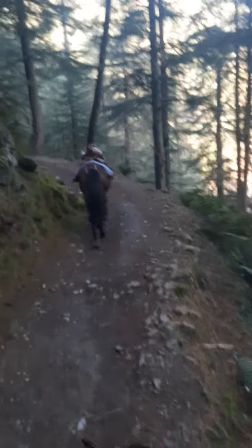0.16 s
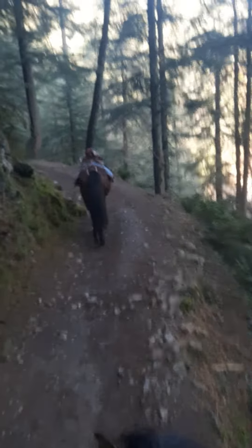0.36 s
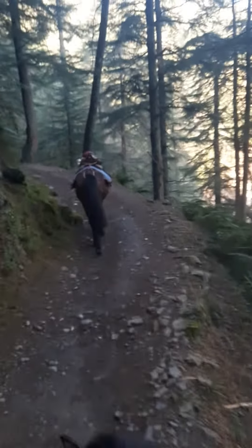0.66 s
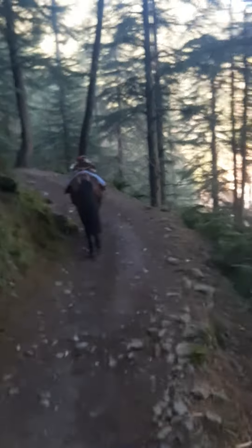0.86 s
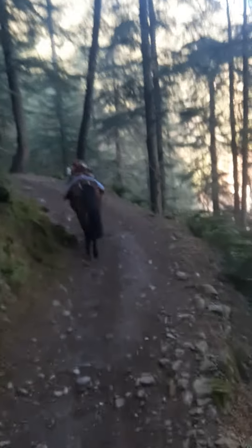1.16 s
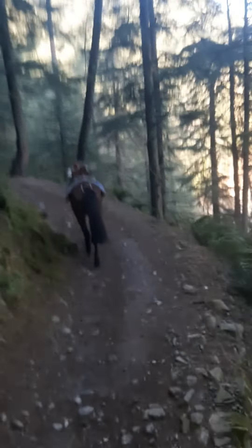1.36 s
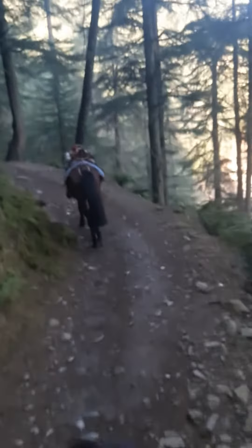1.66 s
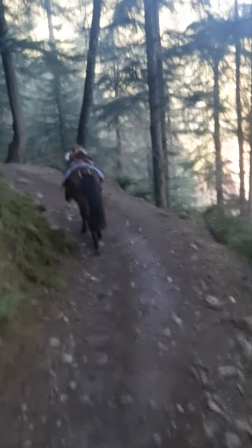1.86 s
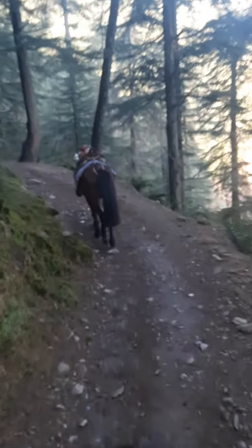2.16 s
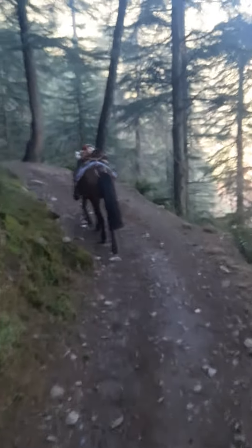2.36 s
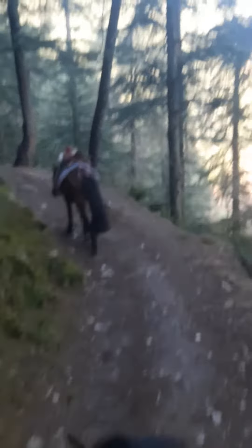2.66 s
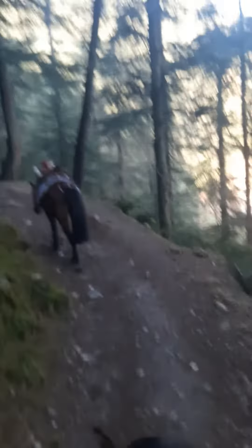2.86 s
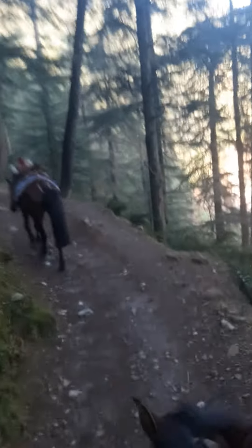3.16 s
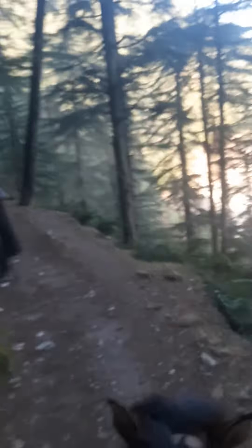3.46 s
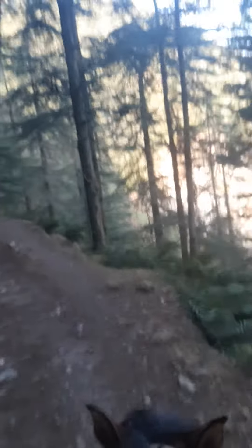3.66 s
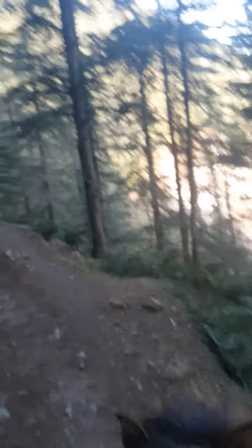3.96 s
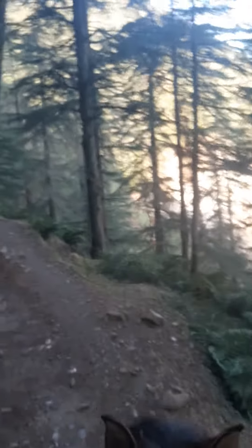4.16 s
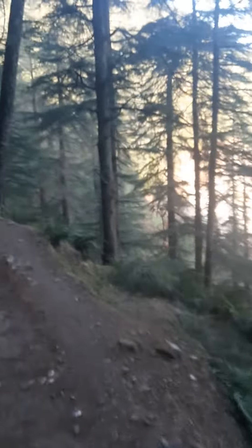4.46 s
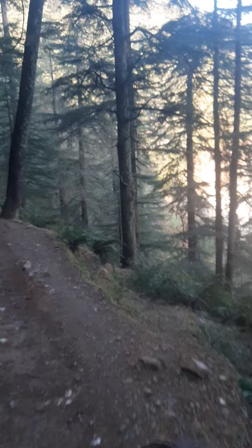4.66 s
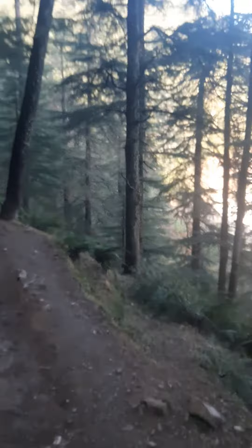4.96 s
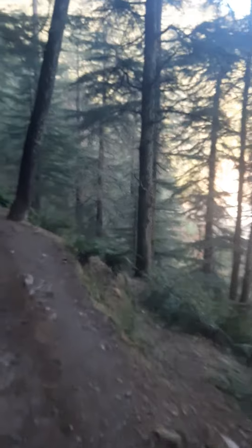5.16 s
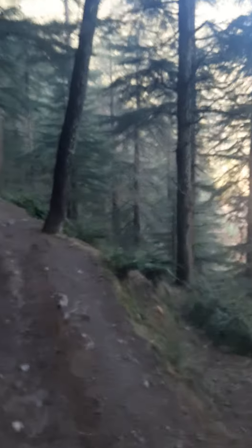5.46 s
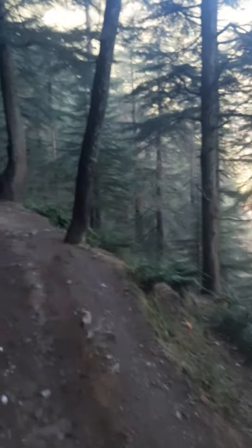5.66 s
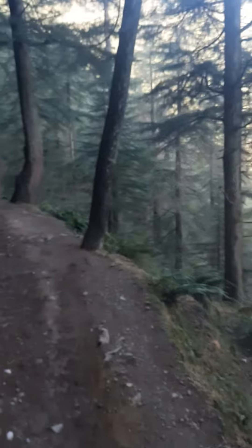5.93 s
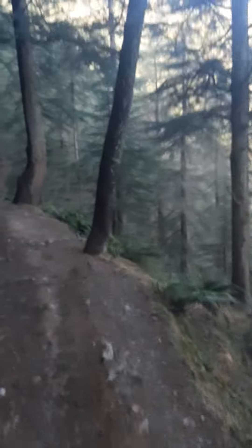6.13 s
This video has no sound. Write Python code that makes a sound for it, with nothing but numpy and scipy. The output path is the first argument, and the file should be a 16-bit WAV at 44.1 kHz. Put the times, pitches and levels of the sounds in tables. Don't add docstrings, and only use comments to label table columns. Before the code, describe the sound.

A horse walks a gravelly dirt path: hollow thuds, sharp stone cracks, rolling pebbles, a finger bump and a brief buckle jangle.

```python
import sys
import numpy as np
from scipy import signal
from scipy.io import wavfile
from scipy.ndimage import uniform_filter1d

SR = 44100
rng = np.random.default_rng(int(sys.argv[2]) if len(sys.argv) > 2 else 0)


def generate_wav(signal):
    frames = np.transpose(np.atleast_2d(signal))
    scaled = np.clip(frames, -1, 1) * 32767
    pcm = np.round(scaled).astype(np.int16)
    wavfile.write(sys.argv[1], SR, pcm)


def linear_from_db(decibels):
    return 10 ** (np.asarray(decibels, float) / 20)


N = 277521
LAG = 20

# middle_s, grit_scuff_db, coat_rustle_db, half_length_s
LEG_SWINGS = [(0.0, -59.5, -64, 0.084), (0.259, -57, -57.5, 0.16), (0.524, -62.5, -60, 0.13),
              (0.686, -61.5, -55.5, 0.068), (0.837, -58, -57, 0.087), (1.085, -58, -64, 0.033),
              (1.212, -62, -67, 0.097), (0.977, -67.5, -71, 0.084), (1.333, -83, -67.5, 0.094),
              (1.413, -66, -73.5, 0.088), (1.617, -63, -62.5, 0.16), (1.793, -80, -64.5, 0.064),
              (2.008, -64.5, -65, 0.27), (2.168, -65.5, -66, 0.13), (2.402, -67, -63.5, 0.083),
              (2.55, -56, -57, 0.11), (2.71, -61, -58.5, 0.058), (2.789, -60, -59.5, 0.035),
              (2.876, -56, -61.5, 0.059), (3.02, -56.5, -55.5, 0.11), (3.13, -57.5, -62.5, 0.094),
              (3.283, -56, -53.5, 0.094), (3.468, -59, -56, 0.13), (3.617, -60.5, -64.5, 0.052),
              (3.715, -54.5, -65.5, 0.058), (3.791, -54, -57.5, 0.048), (3.892, -61.5, -55.5, 0.054),
              (4.006, -53, -51, 0.078), (4.189, -55, -53.5, 0.098), (4.37, -58.5, -57.5, 0.091),
              (4.547, -61.5, -59, 0.11), (4.743, -58.5, -60.5, 0.12), (4.91, -57.5, -54.5, 0.081),
              (5.116, -57.5, -58, 0.11), (5.344, -62, -59.5, 0.11), (5.494, -69.5, -68, 0.047),
              (5.646, -55, -58, 0.09), (5.816, -62, -59.5, 0.07), (5.923, -68, -69.5, 0.068),
              (6.055, -58, -59.5, 0.13), (6.25, -59.5, -59.5, 0.17)]
# start_s, level_db
FINGER_TAPS = [
    (.92405, 3.9),
    (.9247, -4),
    (.9317, 4.9),
]


def evened(x):
    return x / np.sqrt(np.mean(x ** 2) + 1e-20)


def read(points, hz):
    f, value = np.transpose(points)
    return np.interp(np.log(hz + 1), np.log(f + 1), value)


def add(mix, s, sound):
    part = mix[max(round(s * SR), 0):][:len(sound)]
    part += sound[:len(part)]


def blow(hz, db, cycles):
    u = np.arange(round(7 * cycles / hz * SR)) * hz / SR / cycles
    return -linear_from_db(db) * u * np.exp(1 - u) * np.sin(2 * np.pi * cycles * u)


def ring(hz, db, t60):
    t = np.arange(round(np.clip(t60, .004, .3) * SR)) / SR
    return linear_from_db(db - 60 * t / t60) * np.sin(2 * np.pi * hz * t)


def below(x):
    shadow_db, shadow_hz, nearer_db = -5, 5200, 1.9
    low = signal.filtfilt(*signal.butter(1, shadow_hz, fs=SR), x)
    left = np.pad(low + linear_from_db(shadow_db) * (x - low), (LAG, 0))[:N]
    return np.array([left, linear_from_db(nearer_db) * x])


def wash(spectrum, level_db, same, patchy_db, flicker_db, size):
    hop = size // 4
    frames, hz = N // hop + 5, np.fft.rfftfreq(size, 1 / SR)
    a, b, c, d, patches = rng.standard_normal((frames, len(hz), 5)).T
    patches = uniform_filter1d(patches, size=6, axis=0)
    patches = evened(uniform_filter1d(patches, size=16, axis=1))
    flicker = evened(uniform_filter1d(rng.standard_normal(frames), size=3))
    right, same = a + 1j * b, np.clip(same, 0, 1)
    late = np.exp(-2j * np.pi * hz * LAG / SR)[:, None]
    left = same * late * right + np.sqrt(1 - same ** 2) * (c + 1j * d)
    z = np.array([left, right])
    z *= linear_from_db(read(spectrum, hz)[:, None] + patchy_db * patches + flicker_db * flicker)
    noise = signal.istft(z, nperseg=size, noverlap=size - hop)[1][:, :N]
    return linear_from_db(level_db) * evened(noise)


def swings(peaks_db):
    edge_db, edge_power, still_db = 10, 2.6, -98
    s, _, _, half = np.transpose(LEG_SWINGS)[:, :, None]
    t = np.arange(0, N, 64) / SR
    away = abs(t - s) / np.maximum(half, .02)
    swells = linear_from_db(peaks_db[:, None] - edge_db * away ** edge_power)
    power = (swells ** 2).sum(axis=0) + linear_from_db(still_db) ** 2
    return np.interp(np.arange(N) / SR, t, 10 * np.log10(power))


def stride():
    # pitch_hz, level_db
    shuffle = [(30, 9.5), (70, -0.5), (120, 5.5), (250, 9), (420, 7), (800, -32)]
    scuff = [(250, -1), (600, 6), (1000, 5), (1700, 4.5), (2600, -10), (4500, -1), (8000, -44)]
    rustle = [(800, -14.5), (2500, -4.5), (4500, -5), (7000, -4), (12000, -1.5), (16000, -1.5)]
    swish = [(9500, -43), (11500, 10.5), (16000, 6)]
    # middle_s, extra_swish_db, half_length_s
    flicks = [
        (0.2, 8, 0.037),
        (1.58, 14, 0.14),
        (2.25, 0, .025),
        (2.53, 19, 0.083),
        (3.342, 12, .03),
        (4.167, 15.5, 0.075),
        (4.85, -2, .03),
        (5.146, 15, 0.046),
    ]
    _, grit_peaks_db, coat_peaks_db, _ = np.transpose(LEG_SWINGS)
    grit_db, coat_db = swings(grit_peaks_db), swings(coat_peaks_db)

    earth_db = -65 + 0.79 * (grit_db + 58)
    earth = wash(shuffle, earth_db + 6.0, 0.99, 1.0, 1.6, size=1024) * linear_from_db([[-1], [1]])
    grit = wash(scuff, grit_db + 2.5, 0.04, 1.0, 3.3, size=256) * linear_from_db([[-2.5], [2.5]])
    coat = wash(rustle, coat_db + 12.0, 0.0057, 1, 1.0, size=256) * linear_from_db([[-3], [2.5]])

    swish_db = -56.5 + 0.92 * (coat_db + 54)
    t = np.arange(N) / SR
    swish_db += sum(db * np.exp(-((t - s) / half) ** 2) for s, db, half in flicks)
    hair = wash(swish, swish_db, 0.046, 0.95, 0.87, size=256) * linear_from_db([[-10], [3.5]])

    ticks_per_s = 400
    ticks = linear_from_db(1.04 * np.minimum(rng.exponential(1, N), 4)) * (rng.random(N) < ticks_per_s / SR)
    stone = rng.integers(0, 8, N)
    gravel = sum(signal.oaconvolve(ticks * (stone == k), blow(hz, 0, 0.24))[:N]
                 for k, hz in enumerate(np.geomspace(900, 7500, 8)))
    return earth + grit + coat + hair + below(linear_from_db(grit_db - 10.5) * evened(gravel))


def thuds():
    # start_s, peak_db, pitch_hz
    clops = [(0.0204, -37.5, 290), (0.2132, -40.5, 523), (0.2893, -38, 325), (0.7245, -38, 252),
             (0.808, -34, 213), (2.0446, -37, 206), (2.1402, -33, 181), (2.5095, -33, 289),
             (2.5145, -39.5, 252), (2.591, -31, 221), (2.5984, -32, 248), (2.7628, -37, 255),
             (3.0076, -41, 190), (3.134, -34, 255), (3.5151, -33.5, 460), (3.5383, -32.5, 478),
             (4.2442, -27.5, 265), (4.44, -24.5, 182), (4.9069, -34.5, 245), (5.6242, -33.5, 290),
             (5.68, -30.5, 263), (5.7943, -44, 183), (5.9731, -44, 254), (6.064, -31.5, 301)]
    # start_s, peak_db, pitch_hz, length_cycles
    thumps = [(0.0252, -44.5, 134, 1.2), (0.4693, -46.5, 124, 0.6), (0.49, -43.5, 66.4, 0.26),
              (0.6712, -60, 68.6, 1.7), (0.72, -40.5, 110, 1.4), (0.811, -33.5, 72.4, 0.35),
              (1.8605, -37.5, 92, 0.31), (2.3423, -40.5, 127, 0.17), (2.524, -38.5, 75.4, 0.25),
              (2.6084, -37, 109, 0.36), (2.81, -34.5, 143, 0.54), (3.0326, -38, 97, 0.44),
              (3.125, -44.5, 109, 0.75), (3.413, -46, 99, 0.93), (3.545, -32.5, 109, 0.78),
              (3.71, -45.5, 141, 1), (4.7152, -51, 86, 1.2), (5.1683, -32, 108, 0.5),
              (5.176, -32, 94.4, 0.91), (5.3827, -33.5, 105, 0.34), (5.6294, -32.5, 91, 0.68),
              (5.806, -50.5, 99, 0.95), (6.0, -54, 67, 1.9), (6.059, -33, 109, 0.27),
              (6.069, -25.5, 88, 0.52), (6.161, -43, 110, 0.29), (6.277, -28.5, 97, 0.37)]
    # start_s, peak_db, pitch_hz
    slaps = [(0.2829, -32.5, 203), (0.7339, -26.5, 283), (0.8319, -28, 238), (1.166, -31, 304),
             (1.3571, -43, 258), (1.635, -40.5, 230), (1.7026, -41.5, 240), (1.8569, -35.5, 244),
             (2.1564, -31, 230), (2.7705, -26, 198), (3.1304, -37, 434), (3.397, -30.5, 224),
             (3.6717, -37.5, 296), (3.7796, -23, 205), (3.7854, -31, 386), (3.9754, -38.5, 254),
             (4.2491, -26.5, 213), (4.712, -40, 200), (5.1639, -28, 258), (5.1739, -29.5, 216),
             (5.827, -43.5, 153), (6.0556, -20.5, 265), (6.2724, -28.5, 253)]
    # start_s, peak_db, pitch_hz
    cups = [
        (1.9505, -47.5, 212),
        (3.2692, -45.5, 273),
        (3.4033, -36.5, 344),
        (3.5242, -40, 219),
        (3.7795, -36, 185.5),
        (3.9488, -50, 211),
        (4.977, -45.5, 280),
        (5.3769, -36.5, 313),
        (5.6759, -43, 211),
    ]
    out = np.zeros(N)
    kinds = (slaps, 0.54), (clops, 0.98), (cups, 1.87)
    for s, db, hz, cycles in thumps + [(*row, cycles) for rows, cycles in kinds for row in rows]:
        add(out, s, blow(hz, db, np.clip(cycles, .3, 1.6)))
    return out


def cracks():
    # start_s, peak_db, pitch_hz, grit_db
    strikes = [(0.0227, -29, 1200, -10), (0.2878, -42.5, 1270, -2.5), (0.7359, -17, 1560, -22),
               (1.0799, -35, 1300, -6.5), (1.166, -23.5, 2100, -17), (1.2101, -36, 1280, -11),
               (1.2627, -32, 1320, -14), (1.3585, -32, 1040, -8.5), (1.6862, -44.5, 1310, -4),
               (1.8563, -39, 2030, 5.5), (2.0467, -20, 3060, -11.5), (2.1425, -39.5, 1500, -0.5),
               (2.6063, -29, 1810, -8.5), (3.0136, -37.5, 1720, -6), (3.0212, -42, 1670, -1),
               (3.0365, -22, 1620, -14), (3.5407, -36, 840, 4), (3.6714, -37, 1200, 2),
               (3.785, -28.5, 2170, -2.5), (3.9559, -27, 1240, -26), (4.245, -11, 1475, -10),
               (4.268, -39, 1220, 1), (4.4467, -22.5, 1490, -2), (4.9078, -17, 1310, -12.5),
               (5.626, -32.5, 1620, -12), (5.667, -36, 1640, -6), (5.674, -35, 1470, -5),
               (6.2731, -33.5, 1190, -2.5)]
    # start_s, peak_db, pitch_hz, grit_db, splinters_db
    crunches = [(0.2104, -39.5, 1440, -4, -42), (0.7249, -36, 1690, -2.5, -42),
                (0.8093, -29.5, 1570, -14, -37), (2.511, -31.5, 1120, -6, -54), (2.56, -37.5, 900, -6, -49),
                (2.592, -35, 1740, -11, -32.5), (2.773, -31, 1360, -4.5, -30), (3.246, -39, 2090, 0.5, -39),
                (3.3987, -28, 2370, -15, -33), (3.5156, -25, 1170, -9.5, -32),
                (3.5455, -29.5, 1100, -20, -48), (3.7806, -24, 810, -6, -41), (3.7926, -30, 2640, -24, -41),
                (3.973, -32, 1210, -13, -40), (4.0155, -34, 970, -22, -52),
                (4.4421, -14.5, 1350, -10.5, -50), (4.7139, -36.5, 1560, -11, -39),
                (4.9139, -25, 1420, -32, -29), (4.9181, -28, 1500, -12, -42), (5.167, -27, 1520, -5.5, -50),
                (5.382, -28.5, 1230, -10, -32), (5.6036, -25, 3900, -14, -49),
                (5.686, -40.5, 1320, 5, -31.5), (5.6924, -33, 1440, -8, -42),
                (5.7921, -29.5, 1360, -21, -36.5), (6.0554, -24, 1980, -16, -48),
                (6.0621, -29.5, 3600, -11, -28.5), (6.088, -29.5, 1740, -7, -36)]
    # start_s, peak_db, pitch_hz, splinters_db
    chips = [(2.0515, -42, 3520, -23.5), (3.04, -52, 1620, -28), (3.133, -30, 1250, -30.5),
             (3.411, -36, 1880, -27), (3.484, -36.5, 2520, -34), (3.5197, -29.5, 1380, -28.5),
             (3.9502, -31, 1560, -37), (4.2504, -30, 1390, -25), (4.4156, -27, 1080, -28.5),
             (5.1733, -26, 1710, -25), (5.3881, -34.5, 1390, -32.5)]
    strike_splinter_db, chip_grit_db = -60, -44
    hits = [(*row, strike_splinter_db) for row in strikes] + crunches
    hits += [(s, db, hz, chip_grit_db, splinter_db) for s, db, hz, splinter_db in chips]

    out, t = np.zeros(N), np.arange(1300) / SR
    luck = rng.standard_normal((len(hits), 2, len(t)))
    splinter = signal.iirpeak(5600, .8, SR)
    for (s, db, hz, grit_db, splinter_db), (noise, lumps) in zip(hits, luck):
        sharp_db = splinter_db - db
        add(out, s, blow(hz, db + 2.0, 0.7))
        add(out, s + 0.44 / hz, blow(hz * 0.56, db - 0.5, 0.26))
        add(out, s, blow(hz * 2.0, db + 1.3 * sharp_db - 2.5, 0.32))

        lumps = evened(uniform_filter1d(lumps, size=25))
        grains = noise * linear_from_db(4 * lumps - 60 * t / 0.03) * (1 - np.exp(-t / 0.00033))
        body = signal.lfilter(*signal.iirpeak(hz * 0.43, .9, SR), grains)
        add(out, s, linear_from_db(db + min(grit_db, 3) + 14.5) * body)
        shards = signal.lfilter(*splinter, grains) + 0.38 * np.diff(grains, prepend=0)
        add(out, s, linear_from_db(db + sharp_db + 1.0 - 60 * t / 0.027) * shards)
    return out


def loose():
    # peak_s, peak_db, pitch_hz
    slumps = [(0.147, -52, 130), (0.32, -49, 148), (0.558, -53, 75), (0.962, -52, 109), (1.369, -47, 98),
              (1.718, -50.5, 109), (1.968, -53, 146), (2.409, -53, 85.5), (3.272, -47.5, 146),
              (5.19, -39, 97), (5.276, -49, 116), (0.37, -51, 70), (1.22, -45, 111), (3.845, -54, 80),
              (4.315, -53, 75), (4.505, -54, 103), (5.71, -52, 80.5)]
    # peak_s, peak_db, pitch_hz
    knocks = [(0.032, -33.5, 830), (0.181, -45, 694), (0.312, -52, 624), (0.514, -47.5, 590),
              (0.577, -51.5, 290), (0.811, -41, 700), (0.837, -43, 570), (0.951, -51, 226),
              (1.178, -52, 300), (1.224, -48, 678), (1.519, -52.5, 231), (1.55, -51, 328),
              (1.651, -49, 228), (1.698, -49, 678), (1.71, -51, 641), (1.947, -52, 660),
              (2.182, -43.5, 190), (2.506, -41.5, 470), (2.179, -54, 641), (2.594, -42, 575),
              (2.809, -46, 958), (2.916, -50, 470), (2.941, -50, 630), (3.059, -42, 260), (3.067, -45, 560),
              (3.095, -52, 205), (3.269, -42, 668), (3.417, -42, 500), (3.596, -53, 229), (3.994, -45, 256),
              (4.1, -55, 270), (4.158, -49, 738), (4.362, -46.5, 282), (4.4495, -33, 760),
              (4.551, -51, 1070), (4.769, -51, 348), (4.845, -44.5, 750), (4.94, -53, 237),
              (5.006, -50, 250), (5.177, -36.5, 390), (5.342, -50, 670), (5.416, -48, 364),
              (5.588, -47, 203), (5.85, -50, 640), (5.951, -46.5, 249), (6.057, -32, 677),
              (6.197, -46, 308), (6.249, -50, 501), (1.171, -42, 503), (3.79, -29, 594)]
    # peak_s, peak_db, pitch_hz
    gravel_grains = [(0.136, -53, 4310), (0.217, -48, 1190), (0.254, -52, 3500), (0.338, -44.5, 1873),
                     (1.066, -48.5, 4200), (1.081, -52, 4710), (1.094, -38, 1310), (1.168, -37, 3900),
                     (1.179, -33.5, 3180), (1.263, -59, 5130), (1.36, -32.5, 1350), (5.797, -38, 6000),
                     (1.699, -45.5, 1770), (1.861, -38, 3700), (1.946, -49, 2730), (2.694, -50, 2020),
                     (2.809, -45, 5500), (2.962, -44, 1320), (3.019, -44, 4980), (3.037, -35, 2620),
                     (3.071, -39, 1460), (3.155, -42, 2520), (3.179, -36.5, 1440), (3.187, -47, 1922),
                     (3.248, -44, 3580), (3.319, -49, 5000), (3.4245, -40, 6800), (3.433, -46, 1857),
                     (3.547, -38, 4300), (3.461, -43, 1615), (3.469, -42, 1916), (3.678, -36, 3300),
                     (3.714, -44, 1640), (3.951, -23.5, 3520), (4.247, -27.5, 4550), (4.297, -46, 1523),
                     (4.366, -39, 4970), (4.556, -45, 1710), (4.627, -38.5, 1170), (4.653, -40, 1249),
                     (4.845, -42, 3420), (4.937, -36, 1464), (4.998, -42, 1190), (5.166, -30.5, 4630),
                     (5.382, -27, 5260), (5.567, -44, 4200), (5.615, -40, 4500), (5.637, -44, 1800),
                     (5.653, -44, 2300), (5.661, -43, 1863), (5.685, -35, 2160), (5.837, -43, 6500),
                     (6.065, -31, 4360), (6.186, -42, 4300), (6.187, -40, 6300), (6.211, -46, 5000),
                     (6.248, -40, 4220), (6.247, -47, 1800), (6.0885, -25.5, 3200), (4.926, -37, 1010)]
    out, t = np.zeros(N), np.arange(600) / SR
    for rows, cycles in (slumps, 0.73), (knocks, 1.08), (gravel_grains, 1.47):
        for s, db, hz in rows:
            add(out, s - cycles / hz, blow(hz, db, cycles))
    dust_db, dust_t60_s = -3, 0.036
    for (s, db, hz), noise in zip(gravel_grains, rng.standard_normal((len(gravel_grains), len(t)))):
        dust = signal.lfilter(*signal.iirpeak(hz, 1.6, SR), noise)
        add(out, s, dust * linear_from_db(db + dust_db - 60 * t / dust_t60_s))
    return below(out)


def pebbles():
    knocked = [(0.135, -47, 1130), (0.1776, -49, 1250), (0.4718, -45, 1180), (0.9165, -57, 1100),
               (1.2735, -47, 1290), (1.957, -43.5, 1090), (1.9678, -62, 1210), (3.4246, -44, 4300),
               (3.4676, -43, 4720), (3.4775, -44, 4700), (3.7126, -42.5, 1070), (3.8124, -47, 2240),
               (4.1919, -40.5, 3840), (4.661, -41.5, 1160), (4.758, -51, 1430), (4.8439, -45, 1750),
               (5.334, -49, 1450), (5.5655, -54.5, 2140), (5.804, -33.5, 5600), (5.85, -40, 6740),
               (5.887, -48, 3000), (6.2213, -41, 6200)]
    out = np.zeros(N)
    for s, db, hz in knocked:
        add(out, s, blow(hz, db + 12.0, 0.45))
        add(out, s, blow(min(hz * 3, 9000), db + 18.0, 0.053))
    return out


def finger():
    # start_s, pitch_hz, level_db, t60_s
    case = [
        (0.9377, 54, -8.5, 0.064),
        (0.9385, 113, -15.5, 0.12),
    ]
    out, t = np.zeros(N), np.arange(1500) / SR
    step = (1 - np.exp(-t / .00021)) * (1 - t / .0014) * np.exp(-t / .0015)
    for s, db in FINGER_TAPS:
        add(out, s, linear_from_db(db) * step)
    for s, hz, db, t60 in case:
        add(out, s, ring(hz, db, t60))
    return out * linear_from_db([[-60], [0]])


def buckle():
    # start_s, level_db
    jingles = [
        (3.1773, -28),
        (3.308, -31),
        (3.4676, -25),
        (3.484, -33),
        (1.698, -44),
        (6.2204, -38),
    ]
    # pitch_hz, level_db, t60_s, joins_after_s
    modes = [(3230, -9, .6, .012), (7380, 3, .07, 0), (7900, -6, .2, .005), (8650, -3, .4, .008),
             (8920, -6, .4, .008), (15190, 7, .06, -.004), (15320, 6, .4, .012), (15385, 1, .5, .015)]
    jangle_s, jangle_db = 3.305, -46
    out, t = np.zeros(N), np.arange(200) / SR
    for (s, db), snap in zip(jingles, rng.standard_normal((len(jingles), len(t)))):
        add(out, s, np.diff(snap * linear_from_db(db - 60 * t / .006)))
    for (hz, db, t60, late), cluster in zip(modes, rng.standard_normal((len(modes), 12))):
        partials = [k * ring(hz * (1 + 0.004 * np.cos(9 * k)), jangle_db + db, t60) for k in cluster]
        jangle = sum(partials)[:2400]
        add(out, jangle_s + late, jangle * signal.windows.tukey(len(jangle), .3))
    return below(out)


def trees(x, t60):
    t = np.arange(SR // 4) / SR
    taps = rng.choice([-1., 1.], (2, len(t))) * (rng.random((2, len(t))) < 2000 / SR) * (t > .003)
    taps[0] = 0.067 * taps[1] + 0.63 * taps[0]
    taps *= linear_from_db(-60 * t / t60)
    return signal.fftconvolve(x, taps / np.linalg.norm(taps[0]), axes=1)[:, :N]


def scene():
    feet = below(thuds() + cracks() + pebbles())
    soil = signal.lfilter(*signal.butter(2, 260, fs=SR), feet)
    echoes = linear_from_db(-13.5) * trees(feet, 0.086) + linear_from_db(-18.5) * trees(soil, 0.28)
    trail = feet + echoes + stride() + buckle() + loose()
    duck_db, duck_s = -11, .019
    since = np.arange(N) / SR - FINGER_TAPS[0][0]
    ducked = uniform_filter1d(1. * (since > 0) * (since < duck_s), size=90)
    return trail * linear_from_db(duck_db * ducked) + finger()


def gate(x):
    z = signal.stft(x, SR, "cosine", nperseg=2048, noverlap=1024)[2]
    count, width, first, muted_percent = 11, 32, 384, 33
    treble = slice(first, first + count * width)
    bands = z[:, treble].reshape(2, count, width, -1)
    level_db = 10 * np.log10((abs(bands) ** 2).mean(axis=2, keepdims=True) + 1e-20)
    level_db -= 0.85 * level_db.mean(axis=(0, 1), keepdims=True)
    wander = uniform_filter1d(rng.standard_normal(level_db.shape), size=3)
    level_db += 4 * evened(uniform_filter1d(wander, size=3, axis=1))
    is_open = level_db > np.percentile(level_db, muted_percent)
    z[:, treble] = (bands * is_open).reshape(2, count * width, -1)
    return signal.istft(z, SR, "cosine", nperseg=2048, noverlap=1024)[1][:, :N]


def low_pass(x):
    return signal.sosfilt(signal.butter(12, 16650, fs=SR, output="sos"), x)


def record(dry):
    # pitch_hz, level_db
    port = [(20, -31), (45, -2.5), (80, -0.5), (7300, -1), (8300, -10), (9600, -20), (10600, -14),
            (11800, -11.5), (15500, -11.5), (15800, -12), (16000, -63)]
    hz = np.fft.rfftfreq(4096, 1 / SR)
    log_gain = np.log(linear_from_db(read(port, hz)))
    whole = np.concatenate([log_gain, log_gain[-2:0:-1]])
    taps = np.fft.ifft(np.exp(np.conj(signal.hilbert(whole)))).real[:2048]
    heard = signal.oaconvolve(dry, taps[None], axes=1)[:, :N]
    whine_hz, whine_db = 15735, -79
    heard += linear_from_db(whine_db) * np.sin(2 * np.pi * whine_hz * np.arange(N) / SR)
    finished = gate(np.clip(heard, -1, 1))
    return low_pass(finished)


dry = scene()
out = record(dry)
generate_wav(out)
```